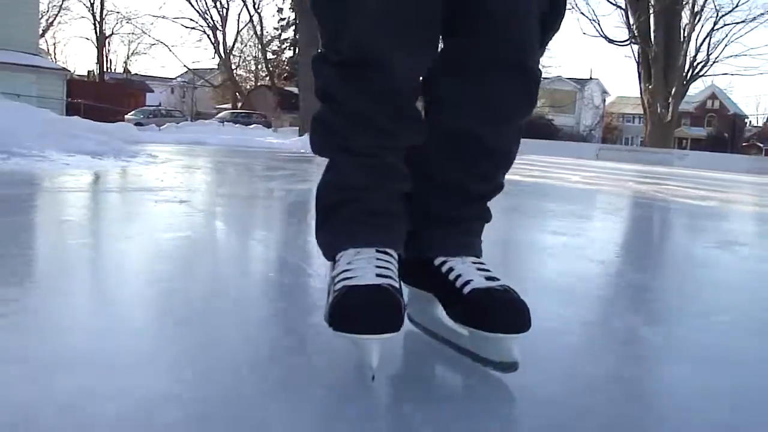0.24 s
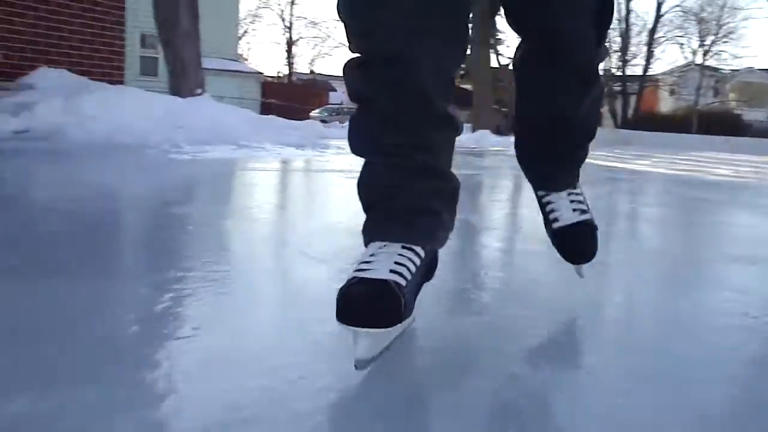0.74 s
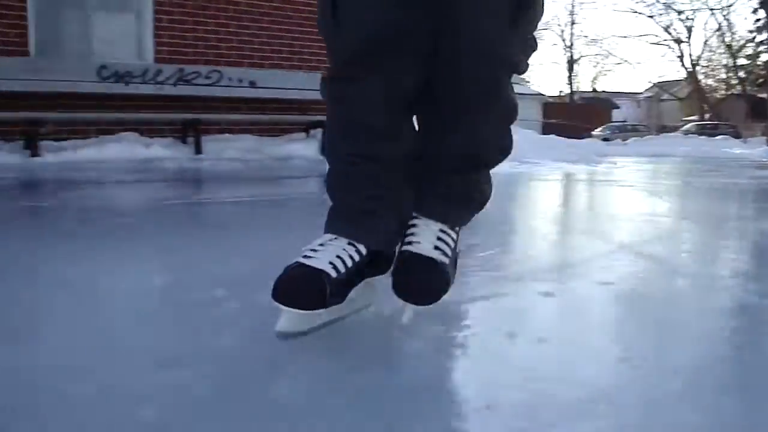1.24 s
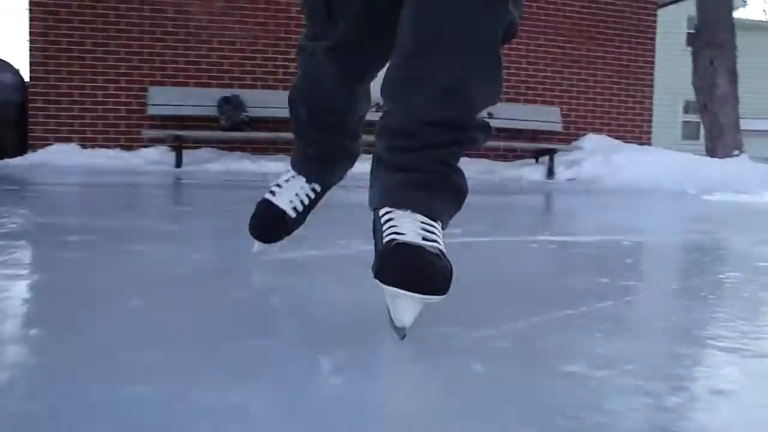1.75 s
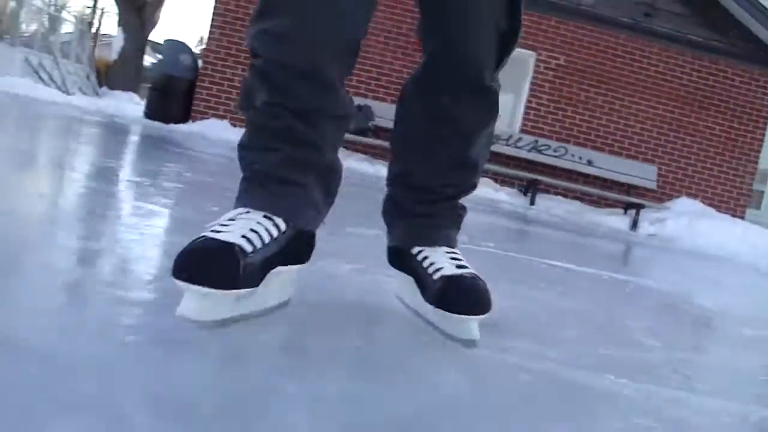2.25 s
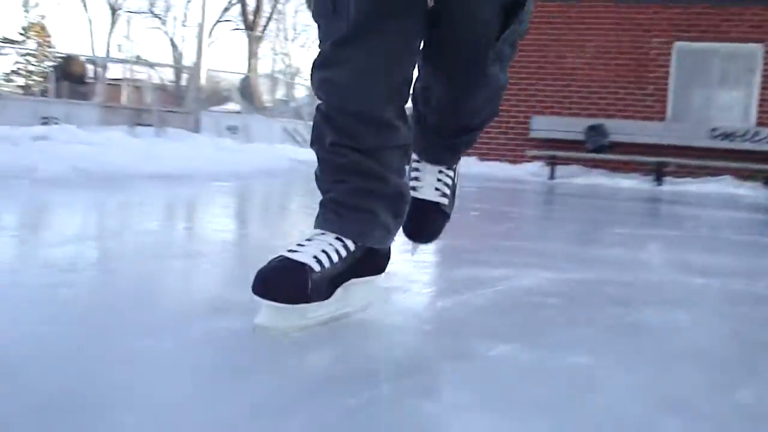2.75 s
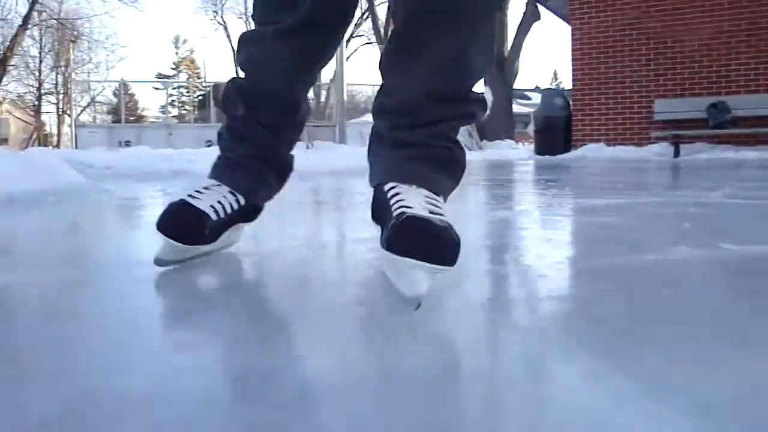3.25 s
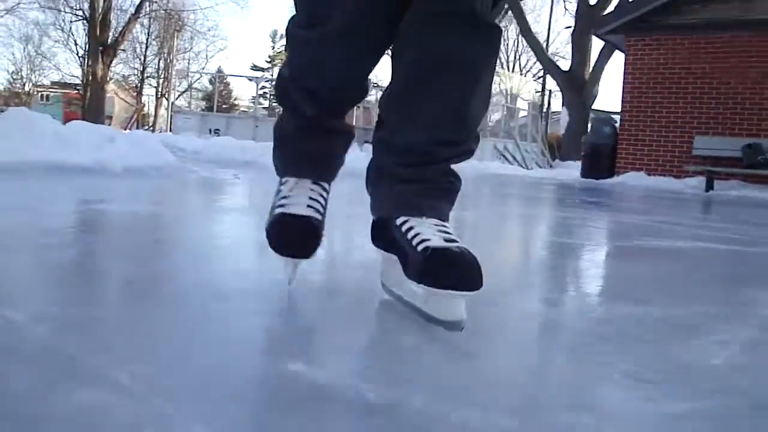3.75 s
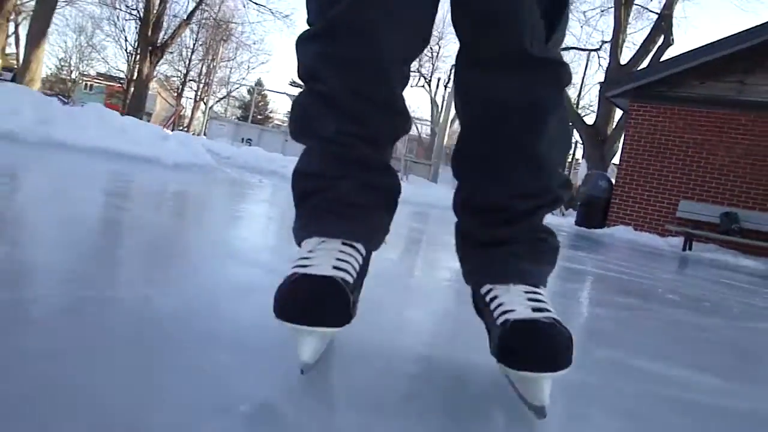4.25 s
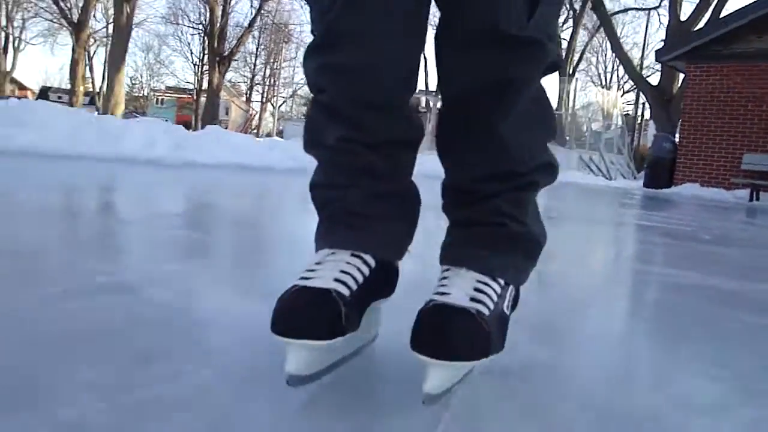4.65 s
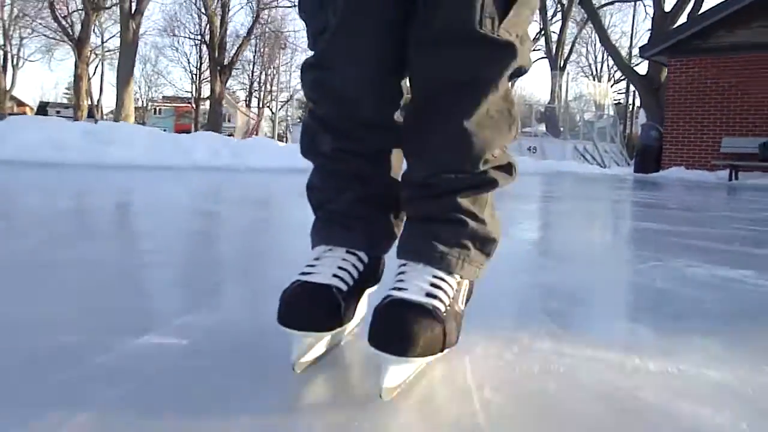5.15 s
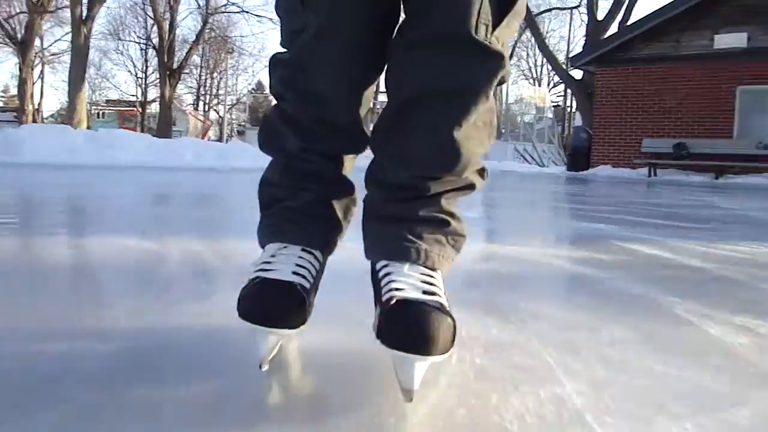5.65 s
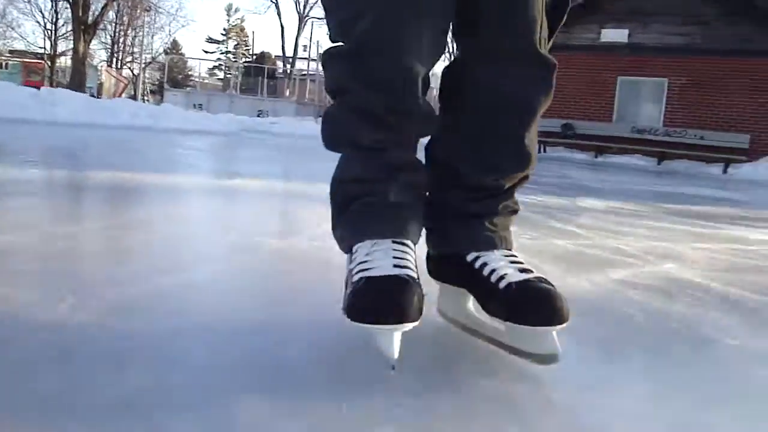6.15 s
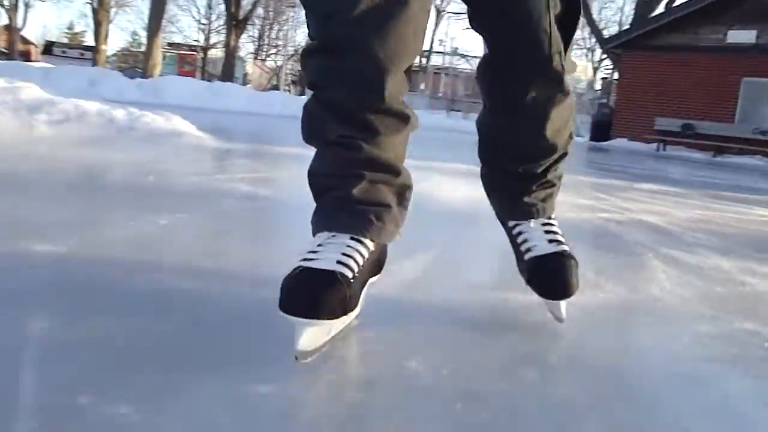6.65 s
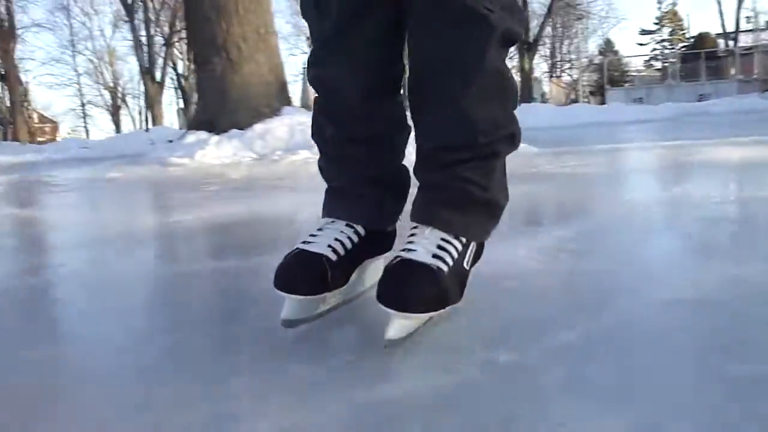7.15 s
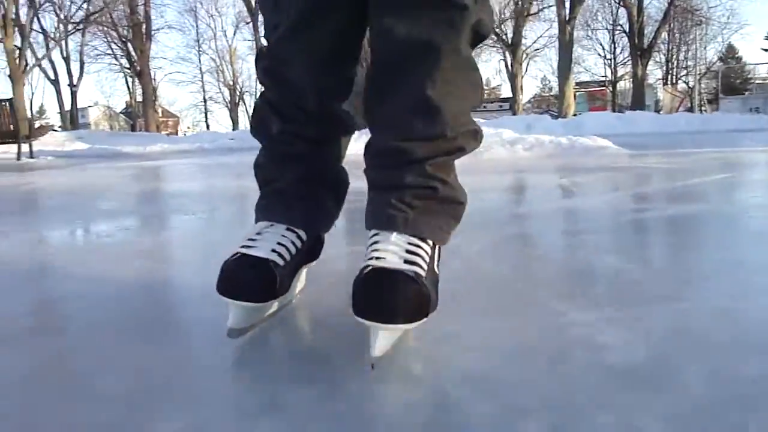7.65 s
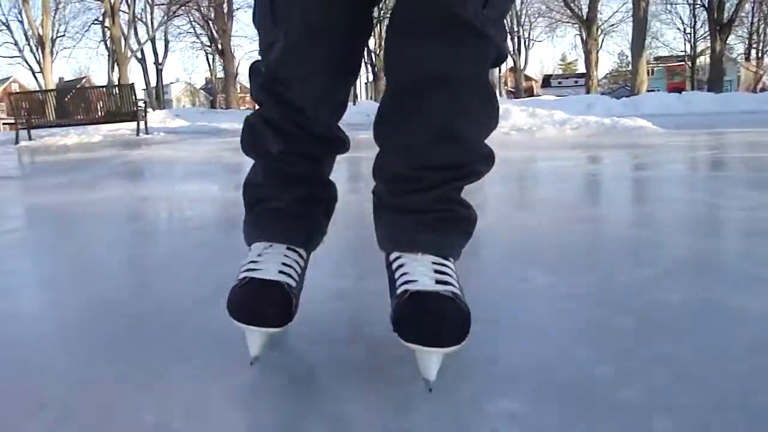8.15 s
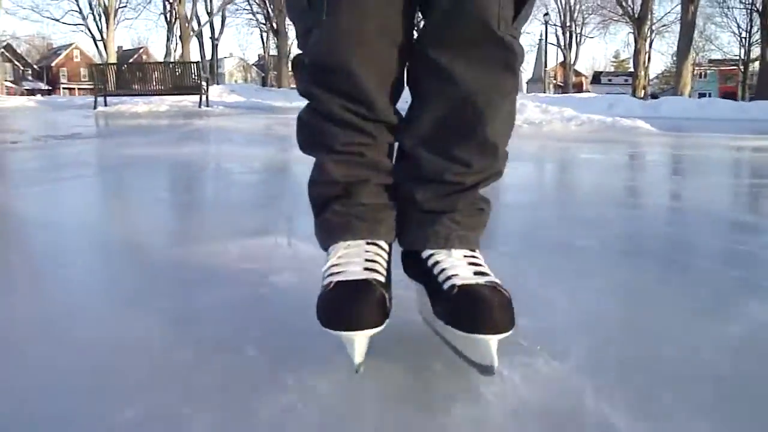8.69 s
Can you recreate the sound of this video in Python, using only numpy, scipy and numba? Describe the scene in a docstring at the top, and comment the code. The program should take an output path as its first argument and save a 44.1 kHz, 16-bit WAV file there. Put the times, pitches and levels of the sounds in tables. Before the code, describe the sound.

A continuous crunchy scrape of skates on ice, mid-bright and dry, juddering irregularly. Brittle chips snap many times a second over finer crackle, while short hollow thuds come from the ice sheet. Edges dig in densely around one and three seconds, ease to a glide, knock heavily around five, grind again before seven, then crackle to the end. Close outdoor microphone, slightly clipped, no reverberation.

```python
"""A gritty, juddering scrape of skate blades on ice, close to a small camera outdoors, full of sharp cracks.
The carving edges are shaped noise: a blade-coloured scrape, a shaving hiss and a rumble of the ice sheet.
Cracks are short splintered noise bursts; dull thuds are damped sines; wind is slow low-passed noise.
The camera's fast gain control ducks after each loud crack."""
import sys
import numpy as np
from scipy import signal
from scipy.fft import rfft, irfft, next_fast_len
from scipy.io import wavfile
from scipy.ndimage import uniform_filter1d, map_coordinates
from numba import njit

SR = 44100
rng = np.random.default_rng(int(sys.argv[2]) if len(sys.argv) > 2 else 0)


def dump(signal):
    """Clip the signal to [-1, 1] and save it as 16-bit WAV at the path in sys.argv[1]."""
    limited = np.clip(np.atleast_2d(signal).T, -1, 1)
    pcm = np.round(limited * 32767).astype(np.int16)
    wavfile.write(sys.argv[1], SR, pcm)


N = 393372  # length in samples

# All source levels are ahead of the camera's gain control.
# Coasting on the blades, before the judder. Each row: time in seconds, carving level in dB,
# shaving hiss level in dB, ice sheet rumble level in dB.
COASTING = [(0, -41.5, -42.5, -46), (.35, -36, -38.5, -51.5), (.55, -29.5, -33.5, -39),
            (.85, -36.5, -34.5, -55), (1.3, -31, -31.5, -34), (1.55, -39, -36, -41.5),
            (1.8, -36, -42.5, -52), (2.25, -35.5, -38, -43), (2.6, -31, -30, -41),
            (3.05, -41, -41.5, -47.5), (3.3, -31, -35, -46.5), (3.8, -39, -44.5, -54.5),
            (4.2, -30.5, -34.5, -39.5), (4.45, -34, -35.5, -48.5), (4.95, -35.5, -39.5, -44.5),
            (5.4, -32.5, -38, -44.5), (5.65, -35.5, -39.5, -42), (6.0, -36, -38, -48.5),
            (6.55, -31, -30, -41.5), (7.25, -36.5, -36, -42), (7.75, -30.5, -35, -44.5),
            (8.1, -38, -39.5, -45), (8.7, -37, -40, -46), (8.92, -36.5, -39, -40)]
# An edge digs in. Each row: start in seconds, length in seconds, carving level in dB,
# hiss level in dB, rumble level in dB (levels at the middle of the stroke).
STROKES = [(0.455, 0.066, -48, -51.5, -36), (0.558, 0.093, -29, -35, -32),
           (0.732, 0.073, -29, -31.5, -36.5), (0.89, 0.13, -29, -28, -35), (0.996, .05, -25.5, -31.5, -30),
           (1.062, .055, -23.5, -29, -31.5), (1.131, .055, -22.5, -24.5, -33.5),
           (1.211, .04, -27, -32, -48), (1.25, .06, -22.5, -29, -32.5), (1.322, .05, -26, -33, -36),
           (1.375, .02, -27, -34, -28.5), (1.415, 0.065, -22, -26.5, -28.5),
           (1.587, 0.041, -24, -29, -33.5), (1.663, 0.062, -24.5, -31, -37.5),
           (1.735, .09, -39.5, -41, -59), (1.843, 0.095, -36, -35.5, -53.5),
           (2.004, 0.037, -29, -34.5, -35), (2.117, 0.1, -27, -30.5, -32.5), (2.309, .085, -25.5, -28, -34),
           (2.384, .08, -24, -25.5, -36), (2.629, 0.048, -37.5, -33, -55), (2.709, .08, -21, -28, -31.5),
           (2.79, .095, -21.5, -27.5, -33.5), (2.896, .025, -21, -25, -36.5), (2.925, .025, -23, -30, -34),
           (2.953, 0.022, -33, -36, -36), (3.117, .014, -23, -31, -33), (3.149, .04, -21.5, -24.5, -31),
           (3.199, .04, -20.5, -31, -30.5), (3.274, .05, -28, -33, -36), (3.349, .05, -28, -33, -35),
           (4.014, 0.1, -33, -36.5, -47), (4.471, .13, -29.5, -29, -38.5), (4.614, .2, -27.5, -28, -37),
           (5.751, 0.14, -31.5, -34.5, -44), (5.9, .09, -37, -58, -47), (6.047, 0.18, -27.5, -27.5, -42),
           (6.259, .17, -24.5, -28.5, -38), (6.484, 0.038, -32.5, -36, -38), (6.641, 0.2, -30, -27, -44),
           (6.715, 0.04, -26, -29, -41), (6.785, .05, -24, -38, -30), (6.87, .055, -22.5, -31, -40),
           (6.938, .07, -21.5, -26.5, -34.5), (7.018, .095, -21.5, -27.5, -34),
           (7.11, 0.04, -27, -36, -33.5), (7.675, 0.056, -31.5, -36, -44), (7.798, 0.12, -32.5, -33.5, -42),
           (8.195, .07, -34, -45, -45.5), (8.297, 0.096, -36, -36, -38.5), (8.864, 0.095, -30, -33, -42)]
# Loud chips breaking. Each row: onset in seconds, level in dB, treble over body in dB, pitch in Hz,
# nominal length in seconds.
LOUD_CHIPS = [(0.039, -16.5, -21.5, 1630, 0.00085), (0.1176, -12, -7.5, 2560, 0.0013),
              (0.183, -12.5, -3, 2840, 0.0019), (0.242, -15.5, -8, 3480, 0.0011),
              (0.373, -21.5, -14.5, 3750, 0.0012), (0.384, -18, -10, 2980, 0.001),
              (0.407, -12, -9.5, 3450, 0.0023), (0.4293, -8.5, -6, 3390, 0.002),
              (0.454, -18, -14, 1300, 0.0014), (0.472, -8.5, -11.5, 3000, 0.0007),
              (0.5184, -9, -20, 3920, 0.0012), (0.557, -8.5, -9, 2320, 0.0012),
              (0.5823, -5, -7.5, 3280, 0.0016), (0.61, -8.5, -14, 2560, 0.0011),
              (0.664, -16, -14, 2600, 0.001), (0.675, -1, -16, 2600, 0.00078),
              (0.7087, -9, -6, 2350, 0.0011), (0.738, -14, -8, 2870, 0.0011),
              (0.802, -8.5, -6, 1090, 0.0015), (0.831, -18, -8, 2600, 0.0017),
              (0.871, -13, -16, 3700, 0.0015), (0.937, -3.5, -17, 2550, 0.0011),
              (1.002, -7, -14, 2275, 0.00076), (1.0335, -4.5, -18, 2490, 0.00065),
              (1.122, -8, -12.5, 2470, 0.00099), (1.338, -10.5, -2.5, 2196, 0.0013),
              (1.383, -10, -9, 2690, 0.0013), (1.484, -8.5, -3, 2500, 0.00076),
              (1.509, -9, -12, 1144, 0.0012), (1.52, -14, -10, 2600, 0.001), (1.556, -13, 0, 2480, 0.0012),
              (1.571, -5.5, -18, 1280, 0.00092), (1.5913, -5, -7, 2510, 0.0013),
              (1.765, -17.5, -17, 3496, 0.0012), (1.831, -18.5, -3, 4340, 0.0017),
              (1.895, -14, -18, 3160, 0.00098), (1.915, -2, -16, 2700, 0.00072),
              (1.945, 3.5, -9.5, 2630, 0.00056), (1.9929, -10.5, -3, 3460, 0.00067),
              (2.006, -7, -9, 1513, 0.00072), (2.064, -11.5, -6.5, 1690, 0.00057),
              (2.1085, -8.5, -3, 2730, 0.00095), (2.137, -8, -14, 2220, 0.001),
              (2.1616, -7.5, -10, 3800, 0.00083), (2.174, -7.5, -5, 3720, 0.00089),
              (2.1975, -4.5, -4, 1660, 0.0017), (2.27, -20, -2, 1100, 0.0013),
              (2.29, -11, -6, 2250, 0.00085), (2.34, -2.5, -16, 2640, 0.0015),
              (2.43, -9, -7.5, 3760, 0.0015), (2.47, -8, -14, 2500, 0.00054),
              (2.477, -4.5, -14, 2610, 0.0012), (2.512, -9, -9, 2520, 0.00061),
              (2.5336, -5, -8, 2510, 0.00057), (2.541, -8, -12, 2800, 0.001),
              (2.565, -4.5, -5.5, 2590, 0.00061), (2.587, -17, -16, 2600, 0.0007),
              (2.625, -13, 4, 3800, 0.00035), (2.714, -11, -28, 2430, 0.00076),
              (2.764, -4, -22, 2577, 0.001), (2.9077, -4.5, -22, 2460, 0.0012),
              (2.929, -3.5, -24, 2444, 0.00086), (2.987, -16.5, -8, 2400, 0.001),
              (3.001, -14, -7, 2316, 0.00094), (3.028, -10.5, -5.5, 2240, 0.00054),
              (3.049, -12.5, -2, 2470, 0.0012), (3.082, -9.5, -16, 2070, 0.0009),
              (3.1057, -15.5, -10, 1930, 0.00079), (3.1224, -5.5, -24, 2450, 0.0014),
              (3.16, -6, -27, 1900, 0.001), (3.205, -4, -30.5, 2423, 0.00086),
              (3.284, -8, -24, 2080, 0.0012), (3.308, -9, -14, 1336, 0.00086), (3.342, -9, -4, 1990, 0.001),
              (3.4794, -10, -17, 3140, 0.00083), (3.508, -14.5, -19, 1075, 0.001),
              (3.561, -21, -14, 3000, 0.0012), (3.581, -15, -15, 2800, 0.001),
              (3.675, -8.5, -12, 3850, 0.00076), (3.7275, -20, -18, 3800, 0.00093),
              (3.7756, -5, -15.5, 1710, 0.0013), (3.8142, -23.5, 6, 3640, 0.00086),
              (3.832, -11.5, -2.5, 2330, 0.0011), (3.8931, -8.5, -11, 3580, 0.00082),
              (3.946, -13, -11, 3880, 0.00091), (3.973, -2.5, -12, 2330, 0.0014),
              (4.021, -12, -8, 2490, 0.0018), (4.033, -8.5, -10, 2800, 0.0011),
              (4.063, -6, -7.5, 2450, 0.00093), (4.069, -9, -10, 3500, 0.0008),
              (4.097, -10, -20, 1760, 0.0015), (4.158, -10.5, -4.5, 3100, 0.0012),
              (4.452, -10.5, -18, 2653, 0.0009), (4.564, -8.5, -13, 2330, 0.001),
              (4.609, -9, -5, 4000, 0.0037), (4.647, -8.5, -5, 2460, 0.0046),
              (4.788, -10, -3, 2500, 0.0012), (4.817, -11.5, -5, 2495, 0.0014),
              (4.847, -13, -15, 2876, 0.0015), (4.8705, -7.5, -8, 2190, 0.0014),
              (4.878, -5, -9, 2500, 0.001), (4.9043, -7, -10, 2780, 0.0017), (4.922, -10, -8, 2600, 0.001),
              (4.9644, -6.5, -10.5, 3020, 0.0014), (4.992, -14, -14, 3320, 0.001),
              (5.005, -5.5, -11, 1420, 0.0006), (5.0424, -13, -4, 2820, 0.00075),
              (5.063, -13, -9, 2430, 0.001), (5.0944, -8.5, -18, 1010, 0.00067),
              (5.153, -16, 2.5, 2600, 0.00068), (5.1856, -15, -1.5, 3140, 0.0012),
              (5.241, -4, -5, 2520, 0.00024), (5.2894, -14, -7, 2670, 0.0019),
              (5.3226, -4.5, -17, 2960, 0.0022), (5.357, -12.5, -7.5, 2970, 0.0023),
              (5.436, -8.5, -16.5, 2100, 0.0013), (5.475, -5.5, -16, 2640, 0.0022),
              (5.5067, -7, -11, 2120, 0.0014), (5.539, -12, -14, 1024, 0.00064),
              (5.575, -9.5, -18, 2650, 0.00095), (5.587, -15, -16, 2500, 0.0007),
              (5.6281, -5.5, -16.5, 2940, 0.00062), (5.664, -13, -23, 2350, 0.001),
              (5.7, -13, -18, 2360, 0.00095), (5.8105, -7, -12, 2590, 0.0019),
              (5.842, -5, -8, 2640, 0.0014), (5.864, -4.5, -15, 2580, 0.00093),
              (5.9925, -12, -13, 2360, 0.00099), (6.102, -9, -2, 2840, 0.00092),
              (6.144, -7.5, -6, 3750, 0.00077), (6.1753, -11, -5, 2764, 0.00086),
              (6.1943, -4.5, -4, 3640, 0.00067), (6.251, -13.5, -4, 1374, 0.00078),
              (6.327, -8, -3, 3670, 0.00085), (6.421, -14, -17, 2300, 0.00077),
              (6.493, -12.5, -17, 2773, 0.0011), (6.579, -6.5, -5, 2860, 0.00076),
              (6.6, -13, 5, 2450, 0.00077), (6.667, -8, -10, 2640, 0.00077),
              (6.724, -14, -8, 2516, 0.00082), (6.791, -7.5, -16, 2260, 0.0017),
              (6.8, -3, -16, 2200, 0.00062), (6.851, -9, -12, 2636, 0.00074),
              (6.87, -10, -20, 2650, 0.0011), (6.898, -9, -23, 2230, 0.00077),
              (6.997, -11, -14, 2400, 0.00089), (7.103, -11, -18, 2510, 0.00085),
              (7.172, -15, -13, 2507, 0.00086), (7.191, -13.5, -16, 3700, 0.0011),
              (7.323, -14.5, -23.5, 3760, 0.0012), (7.356, -11.5, -11, 3620, 0.0014),
              (7.372, -17, -12, 2800, 0.001), (7.413, -13.5, -16, 2390, 0.00091),
              (7.447, -15, -6, 2620, 0.00096), (7.46, -9, -5.5, 3090, 0.0023),
              (7.4855, -4, -17, 2460, 0.0011), (7.514, -9, -6, 2680, 0.0011),
              (7.546, -11, -15.5, 2510, 0.001), (7.593, -9.5, -3, 2710, 0.00085),
              (7.614, -12, -14, 2300, 0.001), (7.648, -15, -25, 2780, 0.001),
              (7.675, -5.5, -24, 2530, 0.00076), (7.689, -6, -16, 2600, 0.0007),
              (7.717, -3, -8.5, 3280, 0.00049), (7.761, -18, -13, 2550, 0.0011),
              (7.775, -10, -7, 3330, 0.0011), (7.802, -2, -10, 2680, 0.00065),
              (7.81, -15, -12, 2600, 0.001), (7.835, -18, -13, 2600, 0.001),
              (7.8415, -6.5, -15, 2330, 0.0011), (7.85, -4.5, -10, 2500, 0.0009),
              (7.883, -8, -5, 2690, 0.00055), (7.907, -15, -12, 2500, 0.001),
              (7.92, -15, -10, 2200, 0.0007), (7.951, -18, -10, 2600, 0.0015),
              (7.9715, -16.5, -15, 2860, 0.001), (7.992, -9, -11, 2640, 0.0011),
              (8.018, -11, -17, 2680, 0.00089), (8.107, -7.5, -26, 2300, 0.00079),
              (8.151, -10.5, -12, 2960, 0.0017), (8.1834, -8.5, -15, 2400, 0.00098),
              (8.207, -13, -15, 2480, 0.00075), (8.2252, -14, -3.5, 2630, 0.0014),
              (8.245, -14, -16, 2740, 0.00083), (8.3, -14, -7, 2700, 0.00074),
              (8.314, -10.5, -5.5, 2630, 0.001), (8.355, -11.5, -4, 2600, 0.0006),
              (8.3669, -7.5, -9, 2550, 0.00093), (8.4445, -14.5, -4, 3170, 0.00039),
              (8.523, -22, -1, 3870, 0.001), (8.568, -19.5, -14, 2660, 0.0012),
              (8.607, -12.5, -2, 2700, 0.0022), (8.628, -10, -5, 2290, 0.0014),
              (8.674, -16, -14, 2350, 0.0012), (8.7, -22, -12, 2760, 0.00068),
              (8.7244, -10.5, -8, 2920, 0.00076), (8.743, -15, -15, 2790, 0.0011),
              (8.7655, -5, -11, 2600, 0.0012), (8.7903, -10.5, -11, 3060, 0.0012),
              (8.813, -12.5, -10, 1040, 0.0012), (8.837, -14, -9, 2520, 0.00085),
              (8.863, -10, -9, 2490, 0.00076), (8.8824, -4, -6, 2690, 0.00078),
              (8.9057, -4, -7, 3620, 0.00091)]
# Blade jolts into the sheet. Each row: onset in seconds, level in dB, pitch in Hz, knock over swing in dB.
JOLTS = [(0.042, -18, 444, 0), (0.118, -11, 510, 0.5), (0.242, -24.5, 441, -2), (0.279, -21.5, 465, -9),
         (0.583, -18.5, 433, 2), (0.709, -19, 482, -10), (0.765, -8.5, 373, -11), (0.832, -20, 440, -5),
         (0.966, -17, 413, -2), (1.13, -17, 500, -5), (1.177, -13, 580, -8), (1.463, -16.5, 480, -3),
         (1.473, -15, 480, -2.5), (1.482, -16, 482, -3), (1.507, -15.5, 494, -4), (1.572, -17, 383, 11.5),
         (1.62, -19, 457, 12), (2.005, -19.5, 497, 2), (2.103, -22, 647, 10), (2.143, -14.5, 494, 1),
         (2.187, -12, 328, 11), (2.265, -14.5, 390, 3.5), (2.288, -19, 425, -1), (2.451, -11.5, 404, -6),
         (2.54, -18.5, 420, -1), (2.701, -17.5, 394, 7.5), (2.771, -17, 450, -3), (2.859, -12, 570, -5),
         (2.878, -15.5, 354.3, 12), (2.999, -20, 427, 3), (3.027, -16.5, 537, -15), (3.081, -22, 490, -7.5),
         (3.12, -20, 365, 0), (3.136, -22, 300, -5), (3.281, -19, 520, -11), (3.34, -23, 378, 0.5),
         (3.36, -20.5, 510, 7), (3.507, -21.5, 418, 1), (3.584, -30, 432, 1), (3.728, -22, 541, 0),
         (3.776, -6.5, 498, 4.5), (3.832, -17, 486, 1), (3.867, -29, 435, 4), (3.893, -16, 473, -3.5),
         (3.972, -12, 473, -9), (4.015, -16.5, 717, -4.5), (4.035, -21, 450, -5), (4.06, -24, 490, -10),
         (4.095, -23, 406, -1), (4.13, -23, 377, 6), (4.139, -20, 403, -3), (4.275, -28, 463, 6),
         (4.315, -29.5, 333, 7), (4.607, -20, 387, -8), (4.65, -18, 391, 3), (4.754, -17, 408, -1),
         (4.847, -22.5, 324, 1), (4.874, -20, 297, 11.5), (4.9, -19.5, 401, 9), (4.964, -13, 384, -9),
         (4.991, -21, 397, -8), (5.004, -7.5, 430, 3.5), (5.017, -9.5, 450, -9), (5.063, -26, 514, -4),
         (5.094, -12, 410, -13), (5.291, -16, 282, -12), (5.324, -9, 377, 0.5), (5.382, -27, 221, -8),
         (5.408, -16, 197, 2.5), (5.447, -16, 262, -4.5), (5.471, -20, 251, 11), (5.501, -13.5, 366, -3),
         (5.507, -15, 407, -9), (5.526, -20, 252, -13), (5.532, -6, 392, 5.5), (5.575, -21, 404, -1.5),
         (5.628, -18, 407, 6.5), (5.862, -19, 354, 2), (6.764, -17, 480.6, -2), (7.142, -20.5, 398, -3),
         (7.388, -22.5, 486, -4), (7.412, -29, 375, -8), (7.457, -23, 330, -6), (7.515, -20.5, 410, 0),
         (7.711, -25.5, 416, 10), (8.108, -25, 410, -8.5), (8.149, -21, 353, -5), (8.246, -25, 400, -2.5),
         (8.565, -22, 382, -6), (8.721, -27, 374, -5)]
# Resonances of blade and holder. Each row: centre in Hz, width in Hz, gain in dB.
BLADE_MODES = [(1320, 970, -7.5), (1720, 91, -9), (2472, 565, 1), (3610, 250, -15.5)]
# Spectrum of carving before the blade rings. Each row: frequency in Hz, relative density in dB per Hz.
CARVE_SPECTRUM = [(290, -42), (500, -4.5), (1100, -7.5), (1220, -1.5), (1570, -2.5), (2480, -1), (3840, 1),
                  (4080, 0), (4350, -7.5), (6000, -2), (7800, -64), (13200, -120)]
# Spectrum of shaved ice, also the treble of a crack. Each row: frequency in Hz, relative density in dB per Hz.
HISS_SPECTRUM = [(2470, -20.5), (4200, -2), (4800, 3), (5430, -2.5), (6340, -2.5), (7420, -1), (8730, -6),
                 (10100, -4.5), (10800, -7), (14100, -9.5), (22000, -120)]
# Spectrum of the rumbling ice sheet. Each row: frequency in Hz, relative density in dB per Hz.
SHEET_SPECTRUM = [(15, -56), (25, -52), (87, -14.5), (253, 0), (374, 4), (477, 3.5), (618, -1), (775, -5.5),
                  (988, -3), (1200, 0), (1560, -54), (2640, -120)]
# Body of a crack before the blade rings. Each row: frequency in Hz, relative density in dB per Hz.
CHIP_SPECTRUM = [(300, -3.5), (900, 0), (2000, -0.5), (4500, -1), (7000, -11), (11000, -52)]
# Regions of ring: high ring, main ring, low body, rasp, upper ring, hollow.
# Each row: centre in Hz, spread (one sigma) in Hz.
RING_REGIONS = [(8230, 720), (2484, 360), (1530, 590), (2150, 210), (3700, 270), (740, 108)]
# Ring as the blades lean and turn. Each row: time in seconds, then the gain of each region above in dB.
LEAN_GAINS = [(0, 2, 3.5, 2, -4.5, 4, -2), (.4, 2, -10, -2, 2.5, 0, 4.5), (.9, 4, 0, 0.5, 2, 0.5, 0.5),
              (1.15, 6.5, 3.5, 7, -2, 5, -2), (1.4, 1.5, -4, 3, 1.5, 0, 4), (2.1, -3, -8.5, -4, 1, -2.5, 2),
              (2.6, 4, 2.5, 7.5, 1, 8.5, -1), (2.9, 1, -2.5, 1.5, 1.5, 5, 0),
              (3.2, -1.5, -6, 3.5, 4.5, 0, 5.5), (3.6, -5, -10, -1, 0, -1.5, 2),
              (4.3, -2.5, -4.5, -1.5, 0.5, 0.5, -6), (5.0, 3, -4.5, 0, 0.5, 0, -1),
              (5.7, 4, -5.5, -2.5, 1, -2, -0.5), (6.1, 1.5, -6.5, -0.5, 1, -1, 5),
              (6.8, 4, -0.5, 5.5, -1, 4, 2.5), (7.079, 1, 0, 2.5, 5, 2.5, 1),
              (7.5, -3, -5.5, 0, 1, 0.5, -2), (8.2, 7, -0.5, 2, -0.5, 0, 2),
              (8.92, 4.5, -3.5, -0.5, -1.5, -2.5, 7.5)]
# Low buffeting on the moving microphone, before its lumps. Each row: time in seconds, level in dB.
BUFFETING = [(0.0, -54), (0.02, -36.5), (0.37, -43), (0.42, -34), (0.47, -35), (0.55, -34.5), (1.54, -44),
             (1.96, -60), (2.18, -42.5), (2.61, -34), (2.63, -49), (2.78, -40), (2.98, -62), (5.29, -39.5),
             (5.54, -32.5), (5.66, -60), (5.91, -39), (6.04, -48), (6.56, -49), (7.57, -57), (8.85, -48),
             (8.92, -62)]

BITE_S, RELEASE_S = 0.009, 0.0055  # how fast a stroke sets in and lets go
SWELL_DB = 2.5  # a stroke presses harder from its start to its end
LEAD = 400  # samples ahead of the peak in each crack and thud
CRACK_RISE_S, THUD_RISE_S = 0.001006, 0.00295  # onset to peak
CRACK_FOCUS, CRACK_FOCUS_DB = 0.21, 7.5  # lift around a crack's own pitch: log-frequency width, height
RAGGED_DB, SPLINTER = 4, 12  # uneven splinters: scatter before smoothing, smoothing in samples
MIDDLE_DB = -30  # carving level of a middle bite
CRUMBS, CRUMB_DB, CRUMB_SPREAD_DB = 1100, -23, 0.5  # small chips: count, level at a middle bite, scatter
CRUMB_GROWS, CRUMB_CROWD = 0.63, 0.8  # dB per dB of bite; exponent of their rate on bite amplitude
CRUMB_TREBLE_DB, CRUMB_HZ = -15.5, 2520  # usual treble over body, usual pitch
CRUMB_S, CRUMB_LOG_SPREAD = 0.00073, 0.77  # usual nominal length, its log scatter
CRUMB_CLEAR_S = 0.007  # no small chips this long before and after a loud one
TOP_HZ = 10960  # upper band limit


def effort():
    """Levels of carving, hiss and rumble in dB: the strokes add their power to the coasting."""
    t = np.arange(N) / SR
    power = amp(curves(COASTING)) ** 2
    for s, length, *db in STROKES:
        near = slice(max(round((s - .1) * SR), 0), round((s + length + .1) * SR))
        since = t[near] - s
        rise = (1 + np.tanh(since / BITE_S)) / 2
        release = (1 - np.tanh((since - length) / RELEASE_S)) / 2
        swell_db = SWELL_DB * np.clip(since / length - .5, -1, 1)
        power[:, near] += rise * release * amp(np.add.outer(db, swell_db)) ** 2
    return 10 * np.log10(power)


def glide(carve_db, hiss_db, sheet_db):
    """The edge bites and lets go many times a second, less so under a hard push; three noises share it."""
    steady = np.clip((carve_db + 36.5) / 14, 0, 1)
    judder = np.tanh(.5 * wobble(30)) + 1.2 * wobble(110) + 2.1 * chatter(80, width=0.0017) - .5
    bite = (1 - 0.86 * steady) * judder

    chips = patchy(grit(500, spread_db=2.5, life=0.0013, share=0.45), depth_db=2.8)
    carve = unit(filtered(chips, lambda f: colour(CARVE_SPECTRUM)(f) * blade(f)))
    shavings = patchy(grit(800, spread_db=-5.5, life=0.00025, share=0.34), depth_db=2.5)
    hiss = unit(filtered(shavings, colour(HISS_SPECTRUM)))
    lumps = grit(200, spread_db=3, life=0.0023, share=0.45)
    sheet = unit(filtered(lumps, colour(SHEET_SPECTRUM)))

    scrape = amp(carve_db + 2.0 * bite) * carve
    shaving = amp(hiss_db + 1.67 * bite) * hiss
    rumble = amp(sheet_db + 3.8 * bite) * sheet
    return scrape + shaving + rumble


def grit(rate, spread_db, life, share):
    """Noise, part steady, part tiny decaying bursts (rate per second, life in s) of bounded size."""
    hits = (rng.random(N) < rate / SR) * amp(spread_db * np.minimum(rng.exponential(size=N), 2.6))
    puffs = signal.lfilter([1], [1, -np.exp(-1 / (life * SR))], hits)
    share = np.clip(share, 0, 1)
    return rng.standard_normal(N) * np.sqrt(1 - share + share * unit(puffs) ** 2)


def chatter(rate, width):
    """Random skips of the blade over rough ice (rate per second): bumps with a sigma of width in seconds."""
    skips = (rng.random(N) < rate / SR) * rng.random(N)
    t = np.arange(-400, 401) / SR
    return signal.fftconvolve(skips, np.exp(-(t / width) ** 2 / 2), mode="same")


def patchy(x, depth_db):
    """Random gain patches in time and frequency: the ice differs from spot to spot."""
    spectrum = signal.stft(x, nperseg=512)[2]
    field = uniform_filter1d(rng.standard_normal(spectrum.shape), size=3, axis=0)
    field = uniform_filter1d(field, size=7, axis=1)
    return signal.istft(spectrum * amp(depth_db * unit(field)), nperseg=512)[1][:N]


def blade(f):
    """The broad resonances of steel runner and plastic holder over a flat path."""
    ring = sum(amp(db) * 1j * f * w / (c * c - f * f + 1j * f * w) for c, w, db in BLADE_MODES)
    return amp(-25.0) + ring


def cracks(carve_db):
    """Each chip creaks in, snaps and crumbles: its body rings the blade, its treble goes straight out."""
    out = np.zeros(N + SR)
    t = (np.arange(2048) - LEAD) / SR
    f = np.fft.rfftfreq(2048, 1 / SR)
    s, db, treble_db, hz, length = np.vstack([crumbs(carve_db), LOUD_CHIPS]).T[..., None]

    u = t / np.clip(length, .0003, .006) / np.where(t < 0, 1.05, .85)
    main = 0.26 * np.exp(-u ** 2 / 2)
    snap = 0.31 * np.exp(-np.abs(t) / 0.00007)
    creak_and_crumble = 0.12 * np.exp(-np.abs(t) / np.where(t < 0, .0022, .0035))
    smooth = main + snap + creak_and_crumble
    steps = np.repeat(rng.standard_normal((len(s), len(t) // 32)), 32, axis=1)
    splinters = uniform_filter1d(steps, size=SPLINTER, axis=1)
    burst = smooth * amp(RAGGED_DB * splinters)

    noise = rfft(burst[:, None] * rng.standard_normal((len(s), 2, len(t))))
    focus = amp(CRACK_FOCUS_DB * np.exp(-(np.log((f + 1) / hz) / CRACK_FOCUS) ** 2))
    body = irfft(noise[:, 0] * colour(CHIP_SPECTRUM)(f) * blade(f) * focus)
    treble = irfft(noise[:, 1] * colour(HISS_SPECTRUM)(f))

    def sized(x):
        """Scaled to the energy of the smooth burst."""
        return x / np.sqrt(np.sum(x ** 2, axis=1, keepdims=True) / np.sum(smooth ** 2, axis=1, keepdims=True))

    sounds = amp(db) * (sized(body) + amp(treble_db) * sized(treble))
    for at, sound in zip(s[:, 0], sounds):
        add(out, at + CRACK_RISE_S, sound)
    return out[LEAD:][:N]


def crumbs(carve_db):
    """Small chips between the loud ones, louder and denser under a hard bite: rows like LOUD_CHIPS."""
    place = rng.random(CRUMBS)
    size, tint, pitch, long = rng.standard_normal((4, CRUMBS))
    crowd = np.cumsum(amp(CRUMB_CROWD * carve_db))
    s = np.interp((np.arange(CRUMBS) + place) / CRUMBS, crowd / crowd[-1], np.arange(N) / SR)
    bite_db = carve_db[(s * SR).astype(int)] - MIDDLE_DB
    db = CRUMB_DB + CRUMB_GROWS * bite_db + CRUMB_SPREAD_DB * np.minimum(size, 1)
    treble_db = CRUMB_TREBLE_DB + 4 * tint
    hz = CRUMB_HZ * np.exp(.3 * pitch)
    rows = np.transpose([s, db, treble_db, hz, CRUMB_S * np.exp(CRUMB_LOG_SPREAD * long)])
    free = np.abs(s[:, None] - np.array(LOUD_CHIPS)[:, 0]).min(axis=1) > CRUMB_CLEAR_S
    rows[~free, 1] = -120  # silenced close to a loud chip
    return rows


def lean(x):
    """The regions of ring swell and fade with the angle of the blades."""
    parts = [filtered(x, lambda f: np.exp(-((f - hz) / width) ** 2 / 2)) for hz, width in RING_REGIONS]
    return x + sum((amp(db) - 1) * part for db, part in zip(curves(LEAN_GAINS), parts))


def thuds():
    """A jolt makes the ice sheet swing for a cycle or two and carries a shorter, higher knock."""
    out = np.zeros(N + SR)
    t = (np.arange(1400) - LEAD) / SR
    for (s, db, hz, edge_db), phase in zip(JOLTS, rng.random((len(JOLTS), 2))):
        fade = np.where(t < 0, (t * hz / 0.62) ** 2, (np.abs(t) * hz / 1.05) ** 1.37)
        swing = np.exp(-fade) * np.sin(2 * np.pi * (hz * t + phase[0]))
        knock = np.exp(-(t / 0.00029) ** 2) * np.sin(2 * np.pi * (1.7 * hz * t + phase[1]))
        add(out, s + THUD_RISE_S, amp(db) * (swing + amp(edge_db) * knock))
    # low cut: keeps the thuds free of deep bass
    return filtered(out[LEAD:][:N], lambda f: (1j * f / (90 + 1j * f)) ** 2)


def wind():
    """Slow lumps of air on the microphone port: low noise under a wandering level."""
    # Each point: frequency in Hz, gain in dB.
    tone = colour([(30, -11.5), (60, -8.5), (110, -6.0), (180, -10.0), (300, -16.0), (800, -76)])
    low = filtered(rng.standard_normal(N), tone)
    lumps_db = 2.5 * np.tanh(wobble(12))
    return amp(curves(BUFFETING)[0] + lumps_db) * unit(low)


def amp(db):
    """Decibels to gain."""
    return 10 ** (np.asarray(db) / 20)


def unit(x):
    """Scaled to rms 1."""
    return x / np.sqrt(np.mean(x ** 2) + 1e-20)


def curves(rows):
    """One value per sample for each column after the time."""
    s, *cols = np.transpose(rows)
    return [np.interp(np.arange(N) / SR, s, c) for c in cols]


def wobble(rate):
    """A smooth random curve, rate knots a second."""
    knots = rng.standard_normal(int(N * rate / SR) + 4)
    return map_coordinates(knots, [np.arange(N) * rate / SR])


def filtered(x, response):
    """x through a complex response of frequency in Hz."""
    m = next_fast_len(N + SR // 2)
    return irfft(rfft(x, m) * response(np.fft.rfftfreq(m, 1 / SR)), m)[..., :N]


def colour(points):
    """A gain curve through points of Hz and dB on a log frequency axis."""
    f, v = np.transpose(points)
    return lambda hz: amp(np.interp(np.log(hz + 1), np.log(f + 1), v))


def add(track, s, sound):
    """Mix a sound whose peak lies LEAD samples in, on a track padded by LEAD."""
    track[round(s * SR):][:len(sound)] += sound


def scene():
    """Blades, thuds and wind in open air, without echoes."""
    levels_db = effort()
    blades = lean(glide(*levels_db) + cracks(levels_db[0]))
    return (blades + thuds() + wind())[None]


@njit
def follow(x, fall):
    """Peak level that jumps up at once and sinks by the factor fall each sample."""
    out, level = np.empty_like(x), 0.0
    for i in range(len(x)):
        level = max(abs(x[i]), level * fall)
        out[i] = level
    return out


def record(dry):
    """Camera microphone: low cut, gain control that ducks late, soft clipping, low cut and band limit."""
    thin = filtered(dry, lambda hz: (1j * hz / (70 + 1j * hz)) ** 2)
    level = follow(thin[0], np.exp(-1 / (0.029 * SR)))
    delayed = np.pad(level, (130, 0))[:N]  # about 3 ms
    late = signal.lfilter([1 / (0.0047 * SR)], [1, 1 / (0.004 * SR) - 1], delayed)
    ducked = thin * amp(2.0) / (1 + (late / 0.42) ** 1.17)
    clipped = ducked / (1 + np.abs(ducked / .7) ** 6) ** (1 / 6)
    return filtered(clipped, lambda hz: (hz < TOP_HZ) * 1j * hz / (60 + 1j * hz))


dry = scene()
out = record(dry)
dump(out)
```